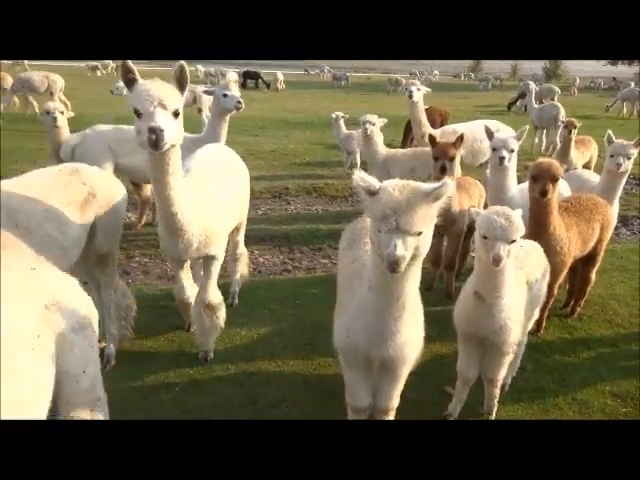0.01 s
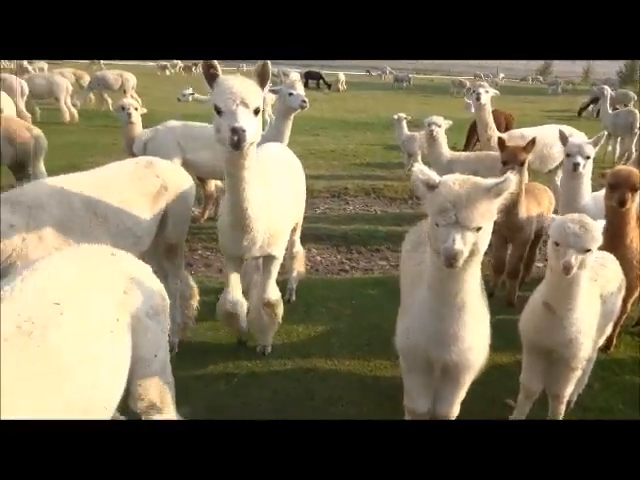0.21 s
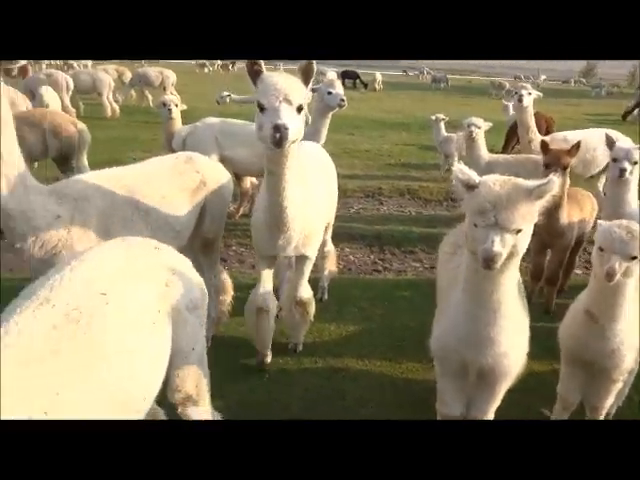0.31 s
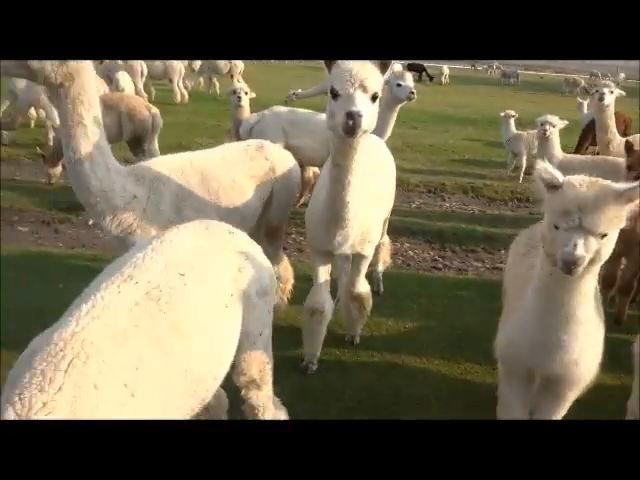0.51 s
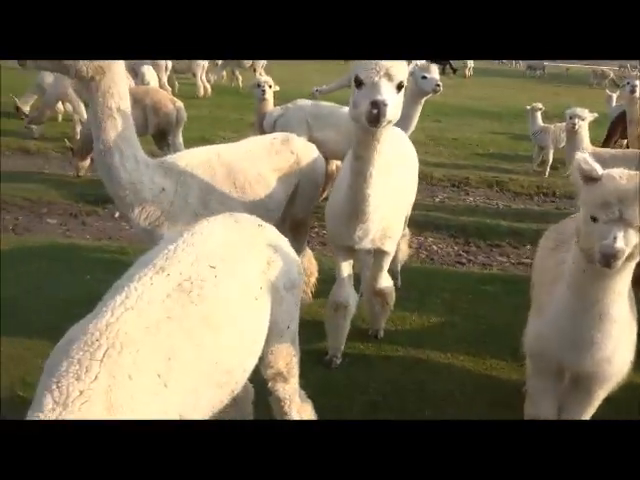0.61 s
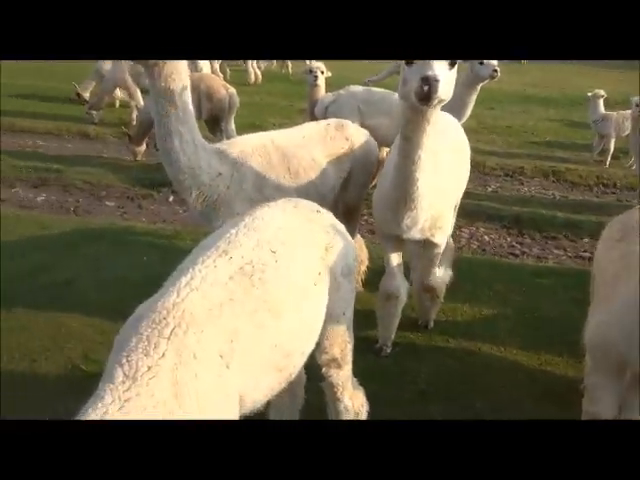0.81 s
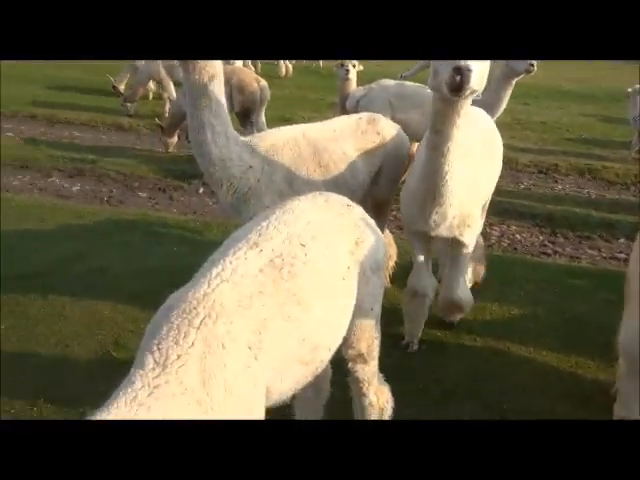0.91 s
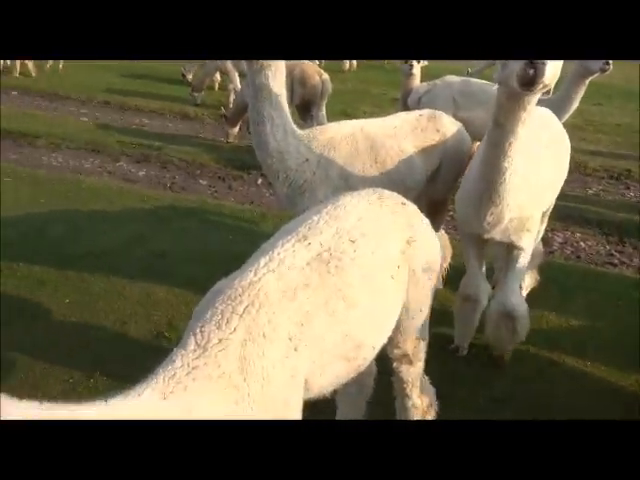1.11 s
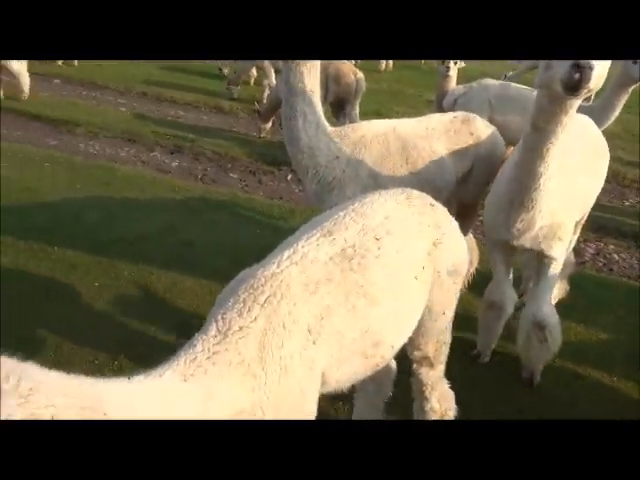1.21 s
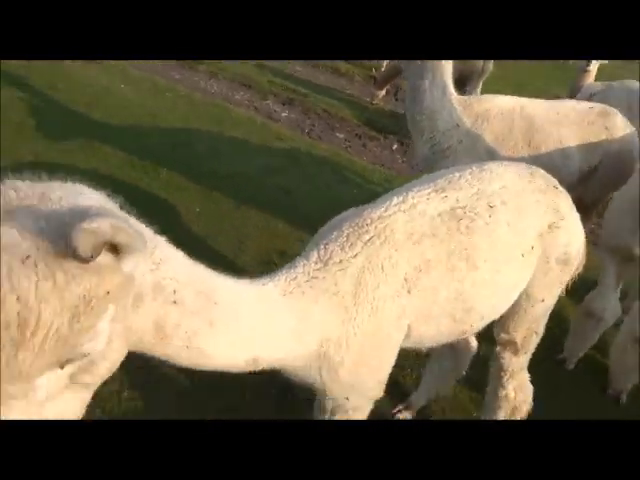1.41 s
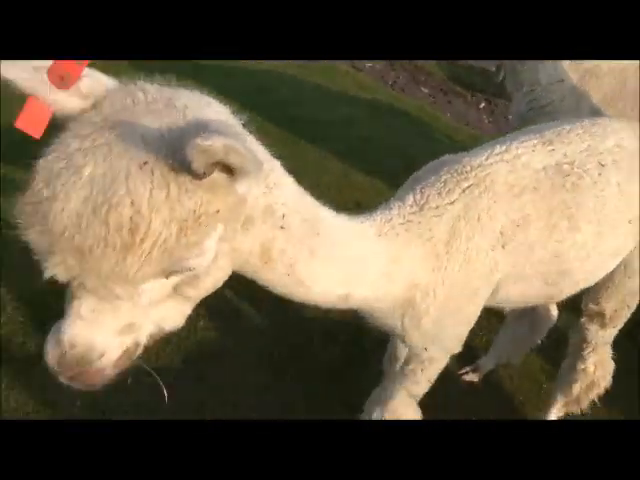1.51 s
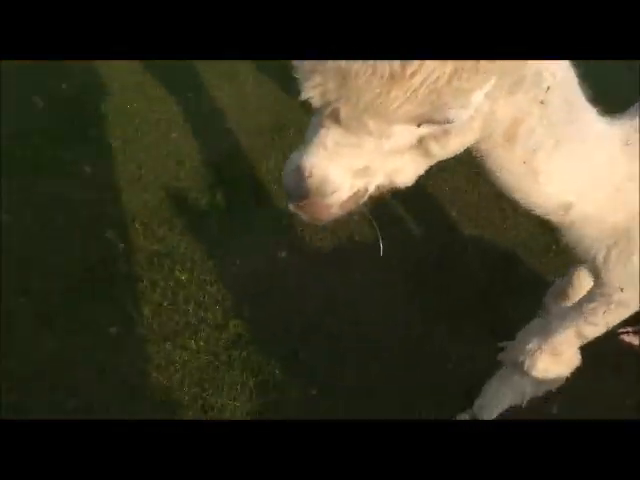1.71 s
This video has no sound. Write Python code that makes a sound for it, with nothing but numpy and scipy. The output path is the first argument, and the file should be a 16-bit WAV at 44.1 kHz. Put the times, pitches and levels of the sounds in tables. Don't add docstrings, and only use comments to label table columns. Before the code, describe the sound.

Six shrill whistled animal notes from a nearby alpaca over faint outdoor hiss and grass ticks

```python
import sys
import numpy as np
from scipy import signal
from scipy.io import wavfile
from scipy.ndimage import uniform_filter1d

SR = 44100
rng = np.random.default_rng(int(sys.argv[2]) if len(sys.argv) > 2 else 0)


def file_out(sig):
    cols = np.atleast_2d(sig).T
    lim = np.clip(cols, -1, 1)
    pcm = np.round(lim * 32767).astype(np.int16)
    wavfile.write(sys.argv[1], SR, pcm)


def amplitude_ratio(level_db):
    exponent = np.asarray(level_db, float) / 20
    return 10 ** exponent


N = 79380

# frequency in Hz, density in dB per Hz.
AIR_SPECTRUM = [(24, -51), (40, -28.5), (849, -3.5), (1420, -8), (1640, -12.5), (2440, -6.5), (11000, -17),
                (14300, -47), (22000, -120)]
# time in seconds, level in dB.
AIR_SWELL = [(0, -1), (.3, -0.5), (.6, 0), (.95, -2), (1.2, 2), (1.44, 0.5), (1.52, 3.5), (1.6, 1.5),
             (1.8, 0.5)]
# frequency in Hz, left-right likeness from -1 to 1.
AIR_LIKENESS = [(30, 0.96), (125, 0.52), (500, 0.24), (1000, -0.54), (3000, 0.46), (11000, 0.68)]
# frequency in Hz, width in Hz, level in dB, left over right in dB,
# drift in dB per second.
AIR_TONES = [(848, 115, -70.5, 1, -1), (1644, 186, -66.5, -9.5, -3), (2142, 128, -72, 1, 2)]
# time in seconds, level in dB.
GUSTS = [
    (0.33, -96),
    (0.43, -83),
    (0.52, -88),
    (0.63, -81.5),
    (0.71, -82),
    (0.87, -91),
    (0.99, -99),
]
# time in seconds, level in dB.
FLOCK_SWELL = [(0, -72), (.1, -63), (.18, -69.5), (.3, -60), (.52, -56.5), (.65, -60), (.95, -62.5),
               (1.13, -60.5), (1.22, -61.5), (1.29, -55.5), (1.4, -63), (1.45, -70), (1.8, -65.5)]
# start in seconds, length in seconds.
CHIRP_TIMES = [(0.958, .035), (1.566, .039), (1.27, .11), (1.60, .055), (1.60, .16), (1.72, .1),
               (0.25, .07), (0.33, .13), (1.665, .04), (0.18, .03), (1.75, .07), (1.77, .05), (0.23, .028)]
# start in Hz, middle in Hz, end in Hz.
CHIRP_PITCHES = [(2950, 3280, 2600), (4200, 4740, 4050), (4300, 3800, 3500), (6150, 4950, 4300),
                 (4000, 3720, 3550), (3900, 4080, 4200), (5200, 4750, 4250), (3900, 3700, 3300),
                 (5250, 5150, 5000), (5000, 5050, 4900), (5700, 6100, 6300), (2750, 3000, 3150),
                 (5350, 5480, 5350)]
CHIRP_LEVELS = [-62.5, -52, -59.5, -59.5, -60.5, -65, -62.5, -61, -64, -68, -67, -67, -64]
CHIRP_BLURS = [.4, .2, 1.0, 1.3, 1.2, .6, 2.6, 1.2, 1.0, .8, 2.0, .8, .8]
# frequency in Hz, width in Hz, level in dB.
BLEAT_THROAT = [(738, 69, -61.5), (1670, 170, -77), (2000, 540, -65), (185, 88, -77.5)]
# time in seconds, ring in Hz, peak in dB, left over right in dB.
TICKS = [(0.248, 1950, -41, -3), (0.2477, 10000, -48, 0), (0.0945, 7500, -45, 3), (0.108, 7500, -45, 2),
         (0.1205, 8000, -47, 2), (0.0725, 9000, -50, 2), (0.481, 450, -54, 3), (0.485, 700, -54, 3),
         (0.4915, 550, -54, 3), (0.5165, 700, -54, 2), (0.52, 350, -58, 0), (0.812, 6500, -52, 3),
         (1.035, 1000, -52, 0), (1.042, 1500, -52, 0), (1.047, 850, -53, 0), (1.097, 850, -50, 0),
         (1.146, 8000, -48, 0), (1.175, 6500, -43, -1), (1.176, 800, -50, -2), (1.1785, 950, -46, -2),
         (1.1882, 7000, -45, -1), (1.192, 7500, -49, -1), (1.2141, 2200, -44, -1), (1.2146, 850, -45, -1),
         (1.2195, 2000, -47, -1), (1.22, 500, -56, 0), (1.337, 5000, -49, -1), (1.369, 2300, -46, -3),
         (1.3697, 1300, -48, -3), (1.3931, 5000, -47, -4), (1.3934, 2800, -41, -4), (1.3942, 1100, -47, -4),
         (1.508, 3400, -42, -2), (1.511, 4500, -44, -2), (1.5115, 1500, -48, -2), (1.5138, 3900, -30, -3),
         (1.5136, 9000, -36, -3), (1.518, 8500, -37, -3), (1.5207, 5000, -41, -3), (1.5227, 7500, -38, -3),
         (1.5255, 6500, -39, -3), (1.674, 6800, -46, -1)]
RUSTLE_TIMES = [0.073, 0.096, 0.108, 0.121, 0.49, 0.52, 1.06, 1.182, 1.222, 1.5, 1.523, 1.545, 1.67, 0.675,
                1.79, 0.835, 1.22]
RUSTLE_COLOURS = [8500, 8500, 8500, 8500, 650, 400, 900, 7000, 700, 5000, 7000, 5000, 7000, 1600, 6000,
                  7500, 5500]
# length in seconds, level in dB.
RUSTLE_SHAPES = [(.004, -62), (.004, -64), (.004, -65), (.004, -65), (.025, -66), (.015, -68), (.05, -65),
                 (.018, -60), (.02, -65), (.035, -57), (.012, -53), (.03, -62), (.012, -60), (.04, -66),
                 (.04, -64), (.012, -63), (.08, -63)]
# time in seconds, pitch in Hz, level in dB.
NOTES = [
    [(0.2195, 4130, -45), (0.229, 4170, -40), (0.24, 4195, -37), (0.248, 4150, -38), (0.256, 3990, -43.5),
     (0.267, 3980, -50)],
    [(0.314, 4260, -44), (0.327, 4500, -33.5), (0.335, 4560, -32.5), (0.362, 4220, -37), (0.4, 4320, -34.5),
     (0.424, 4280, -37.5), (0.448, 4270, -34.5), (0.458, 4240, -34), (0.474, 4000, -50)],
    [(0.547, 4010, -50), (0.564, 4110, -38.5), (0.571, 4075, -42), (0.5755, 4060, -47.5),
     (0.582, 4090, -42), (0.594, 4115, -37), (0.604, 4090, -41), (0.617, 4090, -52)],
    [(0.692, 4150, -50), (0.705, 4190, -40), (0.715, 4200, -42.5), (0.73, 4275, -36.5),
     (0.747, 4260, -36.5), (0.753, 4220, -40.5), (0.764, 4200, -53)],
    [(0.828, 4050, -52), (0.843, 4150, -41), (0.858, 4080, -44), (0.87, 4180, -38), (0.884, 4260, -35.5),
     (0.9, 4230, -39), (0.912, 4180, -47)],
    [(0.996, 4050, -50), (1.010, 4130, -39.5), (1.026, 4090, -41.5), (1.04, 4220, -35.5),
     (1.055, 4290, -33), (1.072, 4285, -33.5), (1.088, 4230, -46)],
]
# onset of half pitch in seconds, its strength in dB, octave in dB,
# left over right in dB.
NOTE_COLOURS = [
    (0.228, -12, -32, 6),
    (0.418, -2, -29.5, 4),
    (0.55, 2, -33, 4.5),
    (0.697, 1, -31, 4.5),
    (0.832, 2, -29, 5.8),
    (1.0, -2, -35, 6.3),
]
# multiple of the whistle's pitch, level in dB.
HALF_PARTIALS = [(0.5, -21), (1.5, -24.5), (2.5, -40.5)]


def rms_one(x):
    return x / np.sqrt(np.mean(x ** 2) + 1e-20)


def clock():
    return np.arange(N) / SR


def at_hz(points, hz):
    table_hz, values = np.transpose(points)
    return np.interp(np.log(hz), np.log(table_hz), values)


def drift(rate_hz):
    r = np.exp(-2 * np.pi * rate_hz / SR)
    wander = signal.lfilter([1], [1, -2 * r, r * r], rng.standard_normal(N + SR // 2))
    return rms_one(wander[SR // 2:])


def resonance(x, hz, width_hz):
    r = np.exp(-np.pi * width_hz / SR)
    turn = 2 * np.pi * min(hz, SR / 3) / SR
    return signal.lfilter(np.array([1, 0, -1]) * (1 - r * r) / 2, [1, -2 * r * np.cos(turn), r * r], x + 1e-18)


def double_resonance(x, hz, width_hz):
    return resonance(resonance(x, hz, width_hz), hz, 2 * width_hz)


def bandpass(x, low_hz, high_hz):
    return signal.sosfilt(signal.butter(2, [low_hz, high_hz], "band", fs=SR, output="sos"), x)


def sine(hz, blur=0):
    return np.sin(2 * np.pi * np.cumsum(hz) / SR + blur)


def pan(x, db):
    return x * amplitude_ratio(np.array([[db / 2], [-db / 2]]))


def bump(centre_s, length_s):
    return np.exp(-.5 * (2 * (clock() - centre_s) / length_s) ** 2)


def hiss():
    out, together = 0, drift(4.0)
    edges = 25 * 2 ** np.arange(0, 9.1, .5)
    white = rng.standard_normal((2, 2, N))
    for k, (low, high) in enumerate(zip(edges, edges[1:])):
        mid, side = bandpass(white[k % 2], low, high)
        hz = np.sqrt(low * high)
        alike = np.clip(at_hz(AIR_LIKENESS, hz), -1, 1)
        gain = amplitude_ratio(at_hz(AIR_SPECTRUM, hz) + 0.81 * together + .9 * drift(20))
        out = out + gain * (np.sqrt(1 + alike) * mid + np.sqrt(1 - alike) * side * [[1], [-1]])
    return amplitude_ratio(-61) * rms_one(out)


def hollow_tones():
    out = np.zeros((2, N))
    for hz, width_hz, db, pan_db, slope_db in AIR_TONES:
        ring = rms_one(double_resonance(rng.standard_normal((2, N)), hz, width_hz))
        level_db = db + slope_db * clock() + 1.0 * drift(4.3) + 1.6 * drift(24)
        out += pan(amplitude_ratio(level_db) * ring, pan_db)
    return out


def gusts():
    rumble = rms_one(bandpass(rng.standard_normal(N), 45, 130))
    return rumble * sum(amplitude_ratio(db) * bump(s, .03) for s, db in GUSTS)


def air():
    s, db = np.transpose(AIR_SWELL)
    return (hiss() + hollow_tones()) * amplitude_ratio(np.interp(clock(), s, db)) + gusts()


def far_flock():
    white = rng.standard_normal((3, N))
    band = double_resonance(white[:2] * 0.32 + white[2], 4380, 230)
    voices = np.zeros((2, N))
    for hz in [4280, 4420, 4530]:
        level = amplitude_ratio(-1 + 2 * drift(11))
        blur = .6 * np.array([drift(60), drift(60)])
        voices += level * sine(hz + 70 * drift(9), blur)
    s, db = np.transpose(FLOCK_SWELL)
    return rms_one(rms_one(band) + voices * 2) * amplitude_ratio(np.interp(clock(), s, db) + 1 * drift(25))


def far_chirps():
    t, out = clock(), np.zeros((2, N))
    chirps = zip(CHIRP_TIMES, CHIRP_PITCHES, CHIRP_LEVELS, CHIRP_BLURS)
    for (s, length), (start_hz, middle_hz, end_hz), db, blur in chirps:
        u = np.clip((t - s) / length, 0, 1)
        pitch = start_hz * (1 - u) * (1 - 2 * u) + middle_hz * (2 * u) * (2 - 2 * u) + end_hz * u * (2 * u - 1)
        swell = amplitude_ratio(db) * np.sin(np.pi * u) ** .7 * np.sqrt(2)
        for side in range(2):
            out[side] += swell * sine(pitch, blur * drift(120)) * amplitude_ratio(1.3 * blur * drift(70))
    return out


def bleat():
    start_s, rise_s, pitch_hz = 1.72, 0.015, 108.9
    cycles = np.cumsum(pitch_hz * (1 + 0.13 * drift(40.1))) / SR
    pulses = rms_one(np.diff(np.floor(cycles), prepend=0))
    source = pulses + 1.0 * rng.standard_normal((2, N))
    on = np.clip((clock() - start_s) / rise_s, 0, 1)
    return on * sum(amplitude_ratio(db) * rms_one(double_resonance(source, hz, width_hz))
                    for hz, width_hz, db in BLEAT_THROAT)


def hoof_ticks():
    out = np.zeros((2, N))
    for s, hz, db, pan_db in TICKS:
        click, first = np.zeros(N), int(s * SR)
        click[first:first + 60] = rng.standard_normal(60) * amplitude_ratio(-.5 * np.arange(60)) * .15
        click[first] = 1
        ring = double_resonance(click, hz, .6 * hz)
        out += pan(amplitude_ratio(db) * ring / np.abs(ring).max(), pan_db)
    return out


def grass_rustles():
    sizes = amplitude_ratio(4.5 * np.minimum(rng.exponential(1, N), 4)) * rng.choice([-1, 1], N)
    sizes = sizes * (rng.random(N) < 5000 / SR)
    grains = sizes + .45 * rms_one(sizes) * rng.standard_normal((2, N)) + .4 * rng.standard_normal((2, N))
    out = np.zeros((2, N))
    for s, hz, (length, db) in zip(RUSTLE_TIMES, RUSTLE_COLOURS, RUSTLE_SHAPES):
        out += amplitude_ratio(db) * rms_one(resonance(grains, hz, .75 * hz)) * bump(s, length)
    return out


def pasture(x):
    echo_db, t60_s, onset_s = -28, .9, 0.025
    t = np.arange(SR) / SR
    tail = rng.standard_normal((2, SR)) * amplitude_ratio(-60 * t / t60_s) * np.clip(t / onset_s, 0, 1)
    tail = tail / np.sqrt(np.sum(tail ** 2, axis=1, keepdims=True))
    return amplitude_ratio(echo_db) * signal.fftconvolve(x, tail, axes=1)[:, :N]


def whistles():
    attack_s, release_s, doubling_rise_s = 0.0069, 0.0057, 0.0024
    scoop_hz, scoop_s, droop_hz, droop_s = 680, .0045, 306, 0.006
    wobble_db, wobble_hz, shimmer_db, breath_db = .35, 9, 1.3, -32
    t, out = clock(), np.zeros((2, N))
    wobble, shimmer, bend = drift(110), drift(140), drift(50)
    breath = rng.standard_normal(N)
    for rows, (doubling_s, half_db, octave_db, pan_db) in zip(NOTES, NOTE_COLOURS):
        s, hz, db = np.transpose(rows)
        since, until = np.maximum(t - s[0], 0), np.maximum(s[-1] - t, 0)
        pitch = uniform_filter1d(np.interp(t, s, hz), size=180) + wobble_hz * bend
        pitch = pitch - scoop_hz * np.exp(-since / scoop_s) - droop_hz * np.exp(-until / droop_s)
        phase = 2 * np.pi * np.cumsum(pitch) / SR
        edge = np.sin(np.pi / 2 * np.clip(np.minimum(since / attack_s, until / release_s), 0, 1)) ** 2
        level_db = uniform_filter1d(np.interp(t, s, db), size=150) + wobble_db * wobble
        level = amplitude_ratio(level_db) * edge * np.sqrt(2)
        octave = amplitude_ratio(octave_db + shimmer_db * shimmer[::-1]) * np.sin(2 * phase)
        doubled = np.clip((t - doubling_s) / doubling_rise_s, 0, 1) * amplitude_ratio(half_db + shimmer_db * shimmer)
        half = doubled * sum(amplitude_ratio(d) * np.sin(k * phase) for k, d in HALF_PARTIALS)
        out += pan(level * (np.sin(phase) + octave + half + amplitude_ratio(breath_db) * breath), pan_db)
    return out


def scene():
    near = whistles()
    return air() + far_flock() + far_chirps() + bleat() + hoof_ticks() + grass_rustles() + pasture(near) + near


def roll_off(x):
    return signal.sosfilt(signal.butter(12, 11420, fs=SR, output="sos"), x)


def record(dry):
    top_cut = signal.ellip(12, .5, 75, 11180, fs=SR, output="sos")
    mix = signal.sosfilt(top_cut, dry)
    return roll_off(mix)


dry = scene()
out = record(dry)
file_out(out)
```